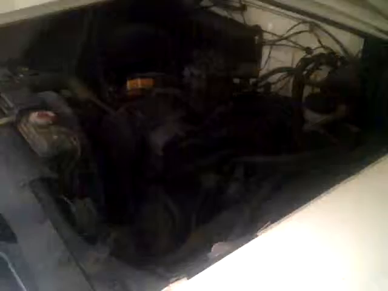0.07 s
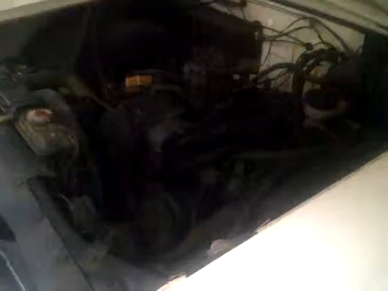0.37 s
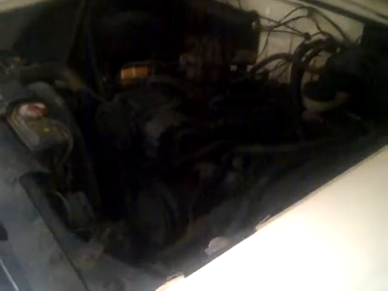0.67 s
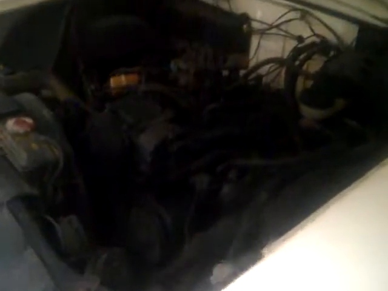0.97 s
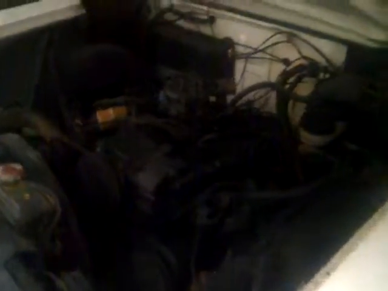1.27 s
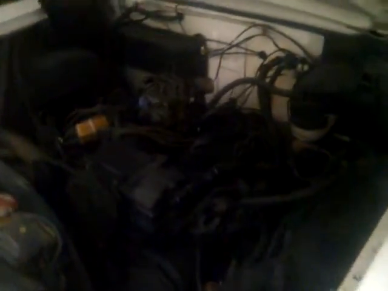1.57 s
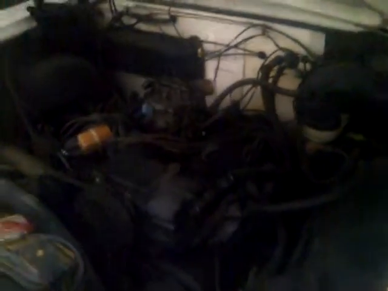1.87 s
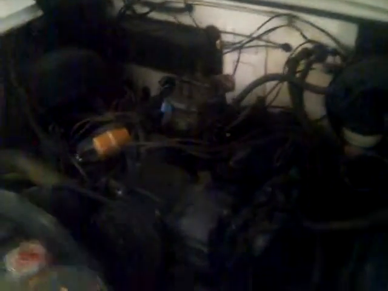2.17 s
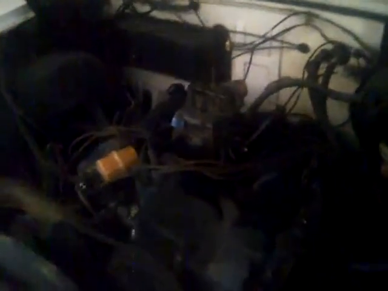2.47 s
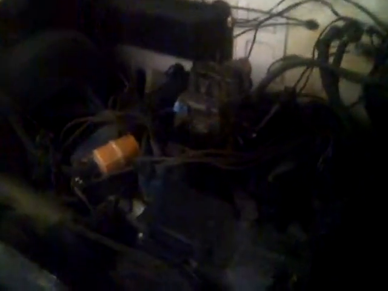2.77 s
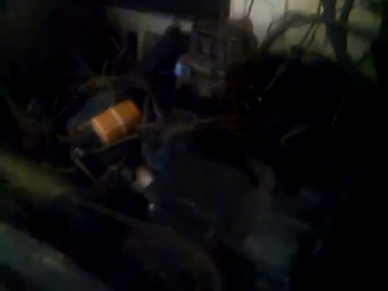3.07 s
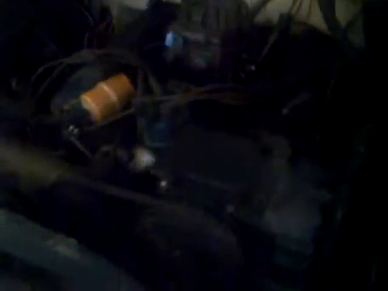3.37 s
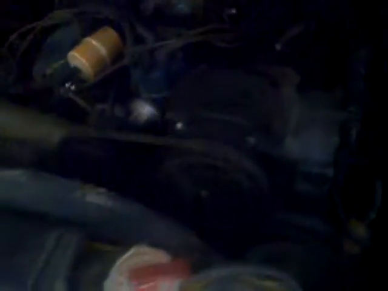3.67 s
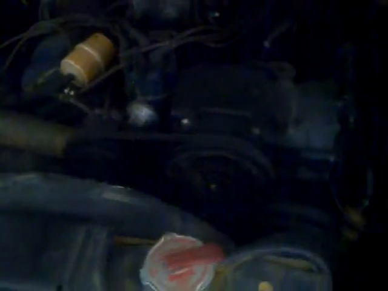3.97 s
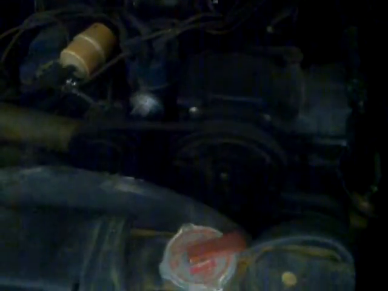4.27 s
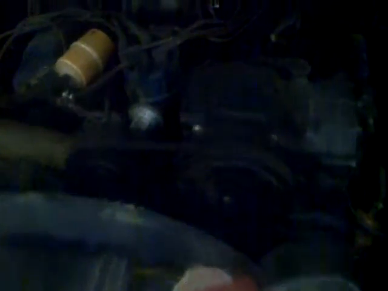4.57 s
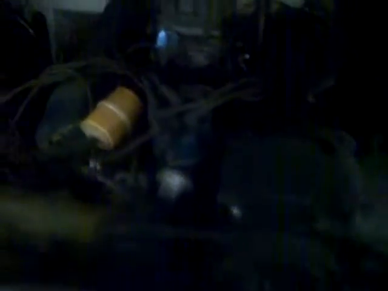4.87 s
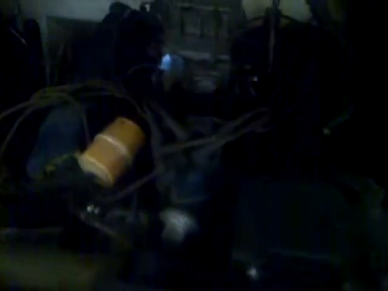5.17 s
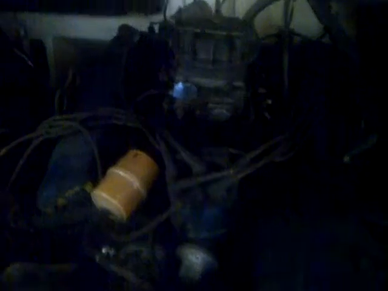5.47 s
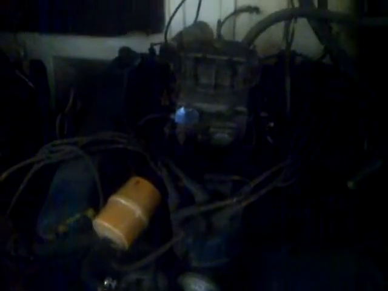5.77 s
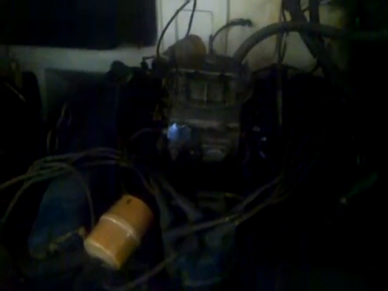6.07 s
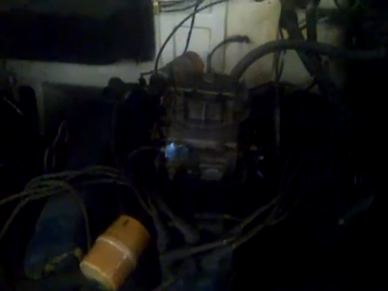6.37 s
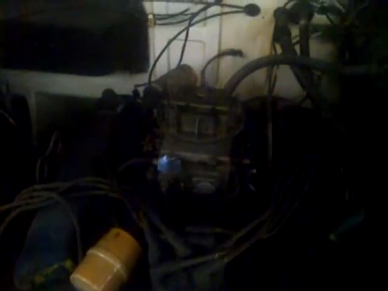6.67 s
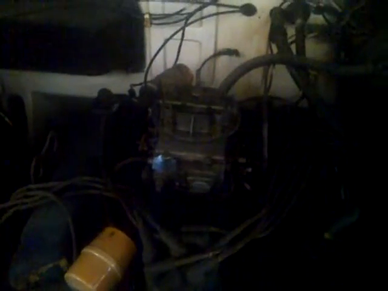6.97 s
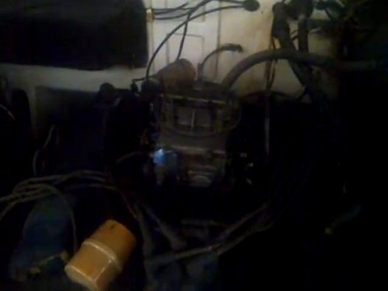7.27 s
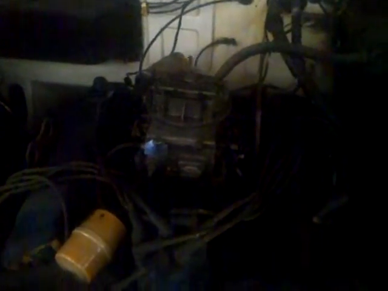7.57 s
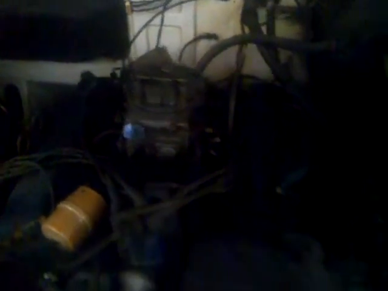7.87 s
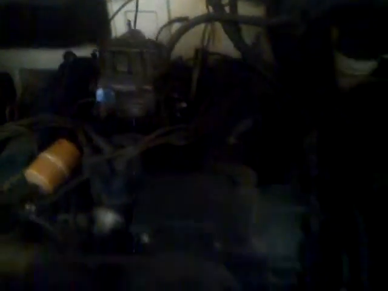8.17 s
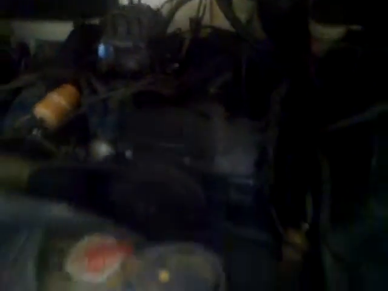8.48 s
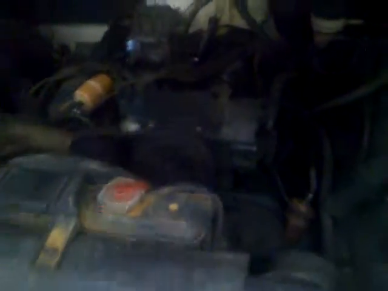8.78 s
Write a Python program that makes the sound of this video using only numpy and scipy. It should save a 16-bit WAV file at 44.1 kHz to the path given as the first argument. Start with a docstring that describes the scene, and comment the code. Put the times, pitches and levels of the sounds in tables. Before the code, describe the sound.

Heard close over an open engine bay, a car idles quickly and evenly, throbbing and ticking throughout. Its belt hisses in regular swishes, broken by tiny squeaks, while a pulley whistles faintly and loose fittings knock now and then. The sound gradually brightens as the microphone moves towards the carburettor and dulls a little as it pulls away at the end.

```python
"""Idling engine, bonnet open

A four-cylinder petrol engine at fast idle. Firings throb in the block, the intake drones, tappets tick
and the engine bay rings. The dry belt swishes once a lap and chirps, loose fittings clack, a pulley
whistles. A handheld mono camera leans towards the carburettor and back, so the treble swells and fades."""
import sys
import numpy as np
from scipy import signal
from scipy.fft import rfft, irfft, next_fast_len
from scipy.io import wavfile
from scipy.ndimage import uniform_filter1d, map_coordinates

SR = 44100
rng = np.random.default_rng(int(sys.argv[2]) if len(sys.argv) > 2 else 0)


def file_out(sig):
    """Save sig as 16-bit WAV at sys.argv[1]."""
    # one column per channel
    cols = np.atleast_2d(sig).T
    # limit, then scale
    lim = np.clip(cols, -1, 1)
    pcm = np.round(lim * 32767).astype(np.int16)
    wavfile.write(sys.argv[1], SR, pcm)


N = 394254


def amp(db):
    """Decibels to gain."""
    return 10 ** (np.asarray(db) / 20)


def unit(x):
    """Scale to rms 1."""
    return x / np.sqrt(np.mean(x ** 2) + 1e-20)


def noise():
    """White noise."""
    return rng.standard_normal(N)


def curve(rows):
    """Rows of time_s, value to one value per sample."""
    return np.interp(np.arange(N) / SR, *np.transpose(rows))


def wobble(rate_hz):
    """Smooth random curve, rate_hz knots a second."""
    knots = rng.standard_normal(int(N * rate_hz / SR) + 4)
    grid = np.arange(len(knots) * 10) / 10
    return np.interp(np.arange(N) * rate_hz / SR, grid, map_coordinates(knots, [grid], mode="nearest"))


def filtered(x, response):
    """Apply a gain given as a function of Hz."""
    size = next_fast_len(N + SR // 2)
    return irfft(rfft(x, size) * response(np.fft.rfftfreq(size, 1 / SR)), size)[:N]


def coloured(x, spectrum):
    """Shape by rows of freq_hz, gain_db; rms 1."""
    hz, db = np.transpose(spectrum)
    return unit(filtered(x, lambda f: amp(np.interp(np.log(f + 1), np.log(hz), db))))


def resonate(x, modes):
    """Parallel resonators, rows of pitch_hz, width_hz, gain_db; rms 1."""
    return unit(filtered(x, lambda f: sum(
        amp(db) * 1j * f * width / (hz * hz - f * f + 1j * f * width) for hz, width, db in modes)))


def swell(phase, sharp):
    """A bump peaking at 1 on each whole turn."""
    return np.exp(sharp * (np.cos(2 * np.pi * phase) - 1))


# time_s, lean (0 at the wing, 1 at the carburettor)
CAMERA_PATH = [(0.2, 0.036), (1.2, 0.064), (2.3, 0.34), (2.9, 0.46), (4.3, 0.48), (5.1, 0.79), (6.2, 0.88),
               (6.9, 1), (7.6, .9), (8.3, 0.61), (8.9, .27)]
# lean, block_db, intake_db, clatter_db, belt_db (before each source's trim)
LEVEL_BY_LEAN = [(0, -45, -48.3, -38.5, -41), (.3, -45, -45.5, -38, -37), (.5, -46.5, -41.5, -37, -35.5),
                 (.8, -47, -40, -35.5, -34), (1, -44, -42.5, -35.6, -34.2)]

def levels_db():
    """Block, intake, clatter and belt levels along the camera's path."""
    lean, *columns = np.transpose(LEVEL_BY_LEAN)
    return [np.interp(curve(CAMERA_PATH), lean, db) for db in columns]


def hum(firing, multiple):
    """Tone at a multiple of the firing rate, wavering in level and phase."""
    level = np.sqrt(2) * amp(2.5 * wobble(11))
    return level * np.sin(2 * np.pi * multiple * firing + 1.33 * wobble(9))


# freq_hz, gain_db
BLOCK_SPECTRUM = [(20, -25.5), (100, -20.5), (135, -19.5), (175, -8.5), (205, -9), (280, -1.5), (420, 0.5),
                  (480, -2.5), (600, -4.5), (1000, -19), (3000, -75.5)]
# firing_multiple, level_db (re the rumble)
BLOCK_HUM = [(5, -23), (8.25, -14.5), (10.05, -8.5), (12.2, -14.5)]

def block(firing, throb):
    """Firings shake the block: a pulsing rumble with hum."""
    rumble = coloured(noise() * (1 + .14 * throb), BLOCK_SPECTRUM)
    return rumble + sum(amp(db) * hum(firing, multiple) for multiple, db in BLOCK_HUM)


# pitch_hz, width_hz, gain_db
INTAKE_MODES = [(551, 55, -3.5), (615, 38, -0.5), (665, 25, -11.5)]

def intake(firing, throb):
    """Gulps of air ring the air cleaner's hollow, with a hum near its pitch."""
    return resonate(noise() * (1 + .28 * throb), INTAKE_MODES) + amp(-13) * hum(firing, 17.9)


def taps(phase, count, scatter_db):
    """Impacts at count set places per turn, each with its own usual force."""
    turns = np.arange(-1, int(phase[-1]) + 2)[:, None]
    due = (turns + (np.arange(count) + rng.uniform(-.4, .4, count)) / count).ravel()
    at = np.interp(due, phase, np.arange(N), left=-SR, right=N + SR)
    at = (at + rng.normal(0, .0002 * SR, due.size)).astype(int)
    usual = rng.uniform(-1, 1, count)
    force = amp(scatter_db * (usual + rng.standard_normal((turns.size, count)))).ravel()
    inside = (at >= 0) & (at < N)
    return np.bincount(at[inside], force[inside], N)


def bay_echo(x, t60_s, echo_db):
    """Dense short reflections between engine, wings and bonnet."""
    t = np.arange(SR // 8) / SR
    tail = rng.standard_normal(len(t)) * amp(-60 * t / t60_s)
    return unit(x + amp(echo_db) * signal.fftconvolve(x, tail / np.linalg.norm(tail))[:N])


def chatter(flare_db, frame_samples):
    """Narrow noise bands flare briefly as small parts take turns to ring."""
    bands = signal.stft(noise(), nperseg=frame_samples)[2]
    flares = uniform_filter1d(rng.standard_normal(bands.shape), 3, axis=0)
    flares = unit(uniform_filter1d(flares, 4, axis=1))
    return unit(signal.istft(bands * amp(flare_db * flares), nperseg=frame_samples)[1][:N])


# freq_hz, gain_db
RATTLE_SPECTRUM = [(200, -42), (450, -10.5), (750, -1), (1000, -1.6), (1120, -1), (1600, -0.5), (2100, -3),
                   (2450, -7.5), (4000, -10), (8000, -29.5)]
# pitch_hz, width_hz, gain_db
COVER_MODES = [(998, 100, -6), (1365, 95, -2), (1557, 43, -2), (2170, 90, -10), (3735, 220, -10),
               (5020, 140, -11)]

def clatter(firing, throb):
    """Tappets tick, small parts rattle, the valve cover rings and a toothed wheel whines."""
    tappets = bay_echo(taps(firing / 4, count=16, scatter_db=3.5), t60_s=.03, echo_db=0)
    pulsing = 1 + .17 * throb
    parts = chatter(flare_db=2, frame_samples=1024) * pulsing * amp(.8 * wobble(120))
    rattle = coloured(unit(parts) + .34 * tappets, RATTLE_SPECTRUM)
    cover = resonate(noise() * pulsing + .33 * tappets, COVER_MODES)
    whine = hum(firing, 38.1)
    return amp(-1.5) * rattle + amp(-8.5) * cover + amp(-22.5) * whine


# throb_db, one per cylinder
CYLINDER_DB = [0.92, -1, 0.9, -1.3]

def engine(firing):
    """Four unequal firings a cycle drive block, intake and clatter."""
    block_db, intake_db, clatter_db, _ = levels_db()
    throb = swell(firing, sharp=2.2) * amp(CYLINDER_DB)[np.round(firing).astype(int) % 4]
    uneven = amp(.5 * wobble(18))
    return uneven * (amp(block_db) * block(firing, throb)
                     + amp(intake_db - 2) * intake(firing, throb)
                     + amp(clatter_db) * clatter(firing, throb))


# pitch_hz, width_hz, level_db, antinode_lean, reach_lean
STANDING_WAVES = [(355, 11, -49.5, 1, .25), (428, 20, -46.5, .09, 0.03), (427, 26, -48, 0.56, 0.06),
                  (443, 80, -47.5, 0.81, 0.08), (564, 34, -45.5, 0.52, .06), (613, 30, -47, .81, .05),
                  (640.5, 21, -47, .98, .07), (965, 26, -47, 0.35, .08), (1166, 31, -48.5, 0.31, 0.14),
                  (1344, 140, -49.5, .85, .2), (1590, 130, -43.5, 1, .04), (1916, 40, -46, .29, 0.07),
                  (1930, 47, -47.5, 0.49, .03), (1970, 80, -44.5, .81, .05), (2928, 70, -49.5, 0.49, 0.26),
                  (3000, 80, -48, .88, .09), (5020, 110, -49, .87, .08)]

def standing_waves():
    """The engine bay rings; each mode swells as the camera passes its antinode."""
    lean, out = curve(CAMERA_PATH), np.zeros(N)
    for hz, width_hz, db, antinode, reach in STANDING_WAVES:
        nearness = np.exp(-.5 * ((lean - antinode) / reach) ** 2)
        out += amp(db) * nearness * resonate(noise(), [(hz, width_hz, 0)])
    return out


# freq_hz, gain_db
HISS_SPECTRUM = [(500, -32.5), (1500, -3.5), (2500, 2), (3800, 1.5), (4600, 1), (5000, 3.5), (6400, 3.5),
                 (7200, 2), (8000, -0.5)]
# peak_s, boost_db
BELT_SCUFFS = [(1.53, 2.8), (1.93, 0), (2.29, 1.5), (3.21, 1.5), (3.49, 1.7), (4.33, 2.3), (4.88, 2.2),
               (5.34, 2.5), (5.76, 2), (6.24, 0.5), (6.48, 1), (6.72, 2), (8.1, 1.5)]
# pitch_hz, width_hz, gain_db
PULLEY_MODES = [(3830, 140, -1.5), (5050, 120, -6), (6120, 250, -4.5)]

def belt(firing):
    """The belt hisses, loudest as its worn stretch comes round; rough passes ring the pulley."""
    t = np.arange(N) / SR
    lap = firing / 8 + .69
    scuff_db = sum(db * np.exp(-((t - peak_s) / .036) ** 2) for peak_s, db in BELT_SCUFFS)
    swish_db = 1.8 * swell(lap, sharp=1.3) + .49 * swell(firing / 2, sharp=2)
    rub = amp(swish_db + scuff_db + .45 * wobble(30))
    # cracks in the rubber tick over a pulley
    ticks = bay_echo(taps(lap, count=21, scatter_db=3), t60_s=.02, echo_db=1.5)
    friction = chatter(flare_db=1.6, frame_samples=512)
    hiss = coloured(friction * rub + .26 * ticks, HISS_SPECTRUM)
    # the crank's jerk between firings makes the belt slip
    slips = swell(firing - .3, sharp=.4) * amp(7 * np.tanh(.7 * wobble(90))) * rub
    squeak = resonate(noise() * slips, [(7106, 290, 0)])
    ring = scuff_db * resonate(noise(), PULLEY_MODES)
    return amp(levels_db()[-1] + 1) * (hiss + amp(-14) * squeak + amp(-16) * ring)


def faint_chirps(count=24, pitch_hz=6890, half_width_s=.0071):
    """Chirp rows for small random slips that follow the belt's level."""
    belt_db = levels_db()[-1]
    at = ((np.arange(count) + rng.random(count)) * N / count).astype(int)
    return [(i / SR, pitch_hz * np.exp(.05 * detune), belt_db[i] - 1.5 + .99 * force, half_width_s)
            for i, (detune, force) in zip(at, rng.standard_normal((count, 2)))]


# peak_s, pitch_hz, relative_db, half_width_s
LOUD_CHIRPS = [(1.636, 6880, -38.5, 0.0093), (3.18, 7150, -36, 0.0092), (3.216, 7100, -36, .014),
               (3.692, 7150, -32, .011), (3.726, 7120, -34, 0.024), (4.316, 6620, -33.5, 0.012),
               (4.365, 6900, -33, .008), (4.895, 7130, -35.5, .03), (5.37, 7180, -31.5, 0.017),
               (5.389, 7200, -28, 0.0054), (5.403, 7100, -31, 0.0036), (5.434, 7130, -30.5, .006),
               (5.756, 6400, -38.5, .018), (5.981, 7000, -32.5, 0.0074), (6.206, 6890, -30, .005),
               (7.64, 6950, -32, .011), (7.693, 7070, -32.5, .017), (8.095, 6000, -35, .015)]

def chirps():
    """Belt slips: short squeaks of unsteady pitch with a dry rasp."""
    t, out = np.arange(N) / SR, np.zeros(N)
    drift_turns = 140 * np.cumsum(wobble(700)) / SR
    rasp = .42 * coloured(noise(), HISS_SPECTRUM)
    for peak_s, hz, db, half_width_s in LOUD_CHIRPS + faint_chirps():
        near = slice(max(int((peak_s - .06) * SR), 0), int((peak_s + .06) * SR))
        tone = np.sin(2 * np.pi * (hz * t[near] + drift_turns[near]))
        envelope = np.exp(-2 * ((t[near] - peak_s) / half_width_s) ** 2)
        out[near] += amp(db) * envelope * (tone + rasp[near])
    return amp(2) * out


# start_s, pitch_hz, level_db
FITTING_CLACKS = [(1.507, 1540, -35), (1.544, 1670, -34.5), (1.823, 1960, -35), (2.141, 1720, -38),
                  (5.757, 2030, -34), (6.222, 1920, -31.5), (6.845, 1550, -30), (8.204, 1650, -34)]

def clacks(t60_s=.1):
    """Loose fittings knock and ring briefly on eight scattered partials."""
    t, out = np.arange(SR // 10) / SR, np.zeros(N + SR)
    for start_s, hz, db in FITTING_CLACKS:
        partials_hz = hz * np.exp(.12 * rng.standard_normal((8, 1)))
        ring = np.sin(2 * np.pi * (partials_hz * t + rng.random((8, 1)))).sum(0) / 2
        out[int(start_s * SR):][:len(t)] += amp(db - 60 * t / t60_s) * ring
    return out[:N]


# peak_s, pitch_hz, level_db, half_width_s
PULLEY_WHISTLES = [(1.54, 6200, -44, .035), (1.94, 3810, -48, .06), (2.288, 3910, -42.5, .04),
                   (2.5, 2960, -45.5, 0.1), (2.81, 2920, -42, 0.15), (3.22, 3770, -43, .025),
                   (4.33, 3850, -41, .018), (5.35, 3600, -41, .03), (5.76, 3790, -42, 0.033)]

def whistles(width_hz=95):
    """A dry pulley sings: a narrow, fluttering tone that swells and fades."""
    t, out = np.arange(N) / SR, np.zeros(N)
    for peak_s, hz, db, half_width_s in PULLEY_WHISTLES:
        envelope = np.exp(-((t - peak_s) / half_width_s) ** 2)
        out += amp(db) * envelope * resonate(noise(), [(hz, width_hz, 0)])
    return out


# time_s, firing_rate_hz
ENGINE_SPEED = [(0, 35.15), (1.8, 35.1), (2.5, 34.5), (4.1, 34.55), (4.9, 35.8), (5.6, 35.8), (6.2, 35.45),
                (7.5, 35.45), (8, 34.9), (8.9, 35.4)]

def scene():
    """Engine and belt follow the crankshaft; one microphone feeds both channels."""
    firing = np.cumsum(curve(ENGINE_SPEED)) / SR - .25  # phase, one turn per firing
    sound = engine(firing) + standing_waves() + belt(firing) + chirps() + whistles() + clacks()
    return np.array([sound, sound])


def record(dry):
    """The camera starts late and drops the bass; coarse sampling mirrors the top treble upwards."""
    start_s, fold_hz, top_hz = .136, 8000, 9114
    t = np.arange(N) / SR
    bass_cut = lambda hz: amp(np.interp(hz, [30, 110, 170], [-8, -9, 0]))
    sound = filtered(dry[0], lambda hz: bass_cut(hz) * np.clip((fold_hz - hz) / 520, 0, 1))
    sound *= np.clip((t - start_s) / .0016, 0, 1)
    mirrored = sound * (1 + 2 * np.cos(2 * np.pi * 2 * fold_hz * t))
    edge = lambda hz: amp(np.interp(hz, [7300, 7800, 8287, 8703, 9120], [1, 4.5, -4, -21.5, -43]))
    return np.tile(filtered(mirrored, lambda hz: edge(hz) * (hz < top_hz)), (2, 1))


dry = scene()
out = record(dry)
file_out(out)
```